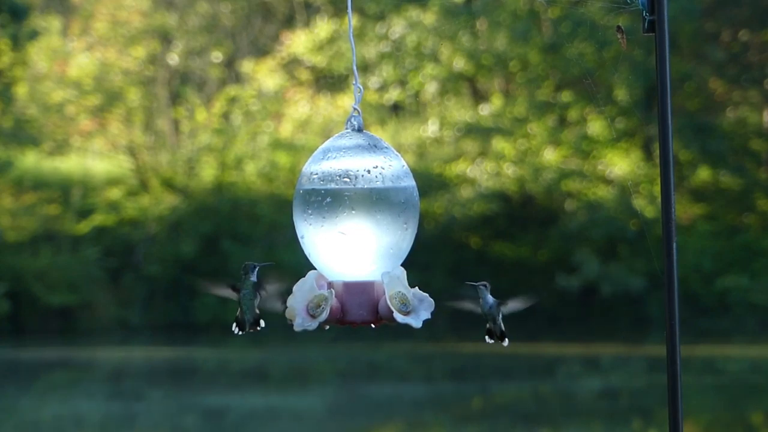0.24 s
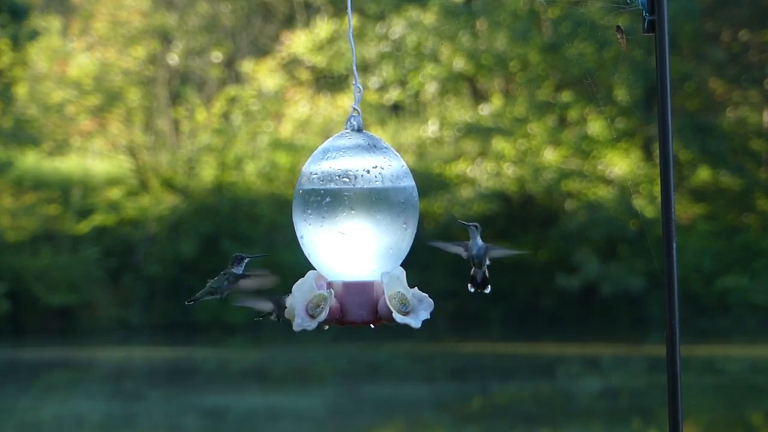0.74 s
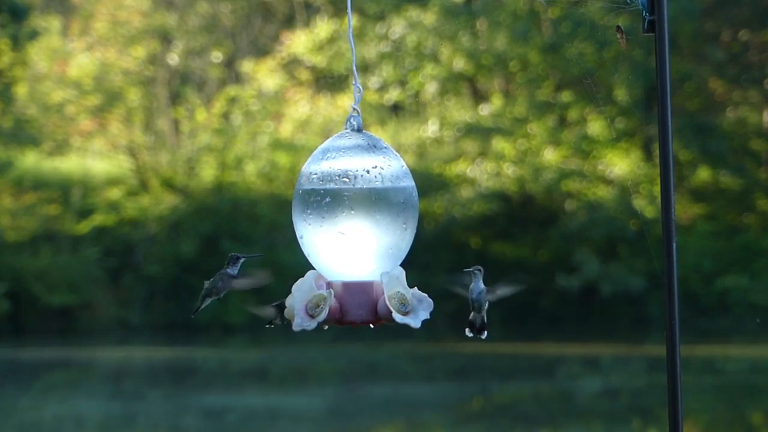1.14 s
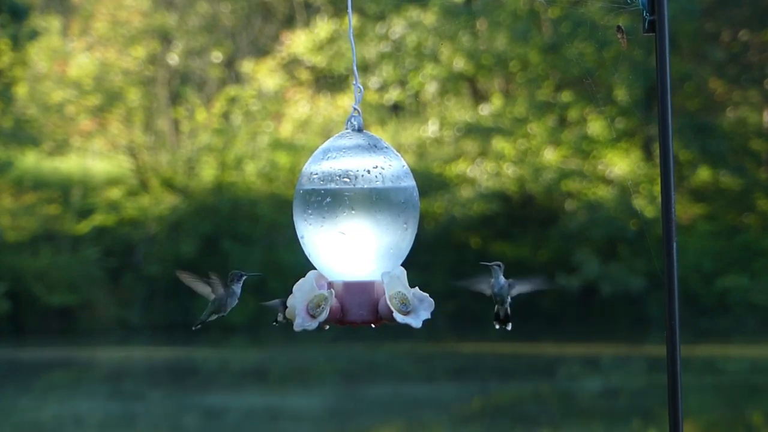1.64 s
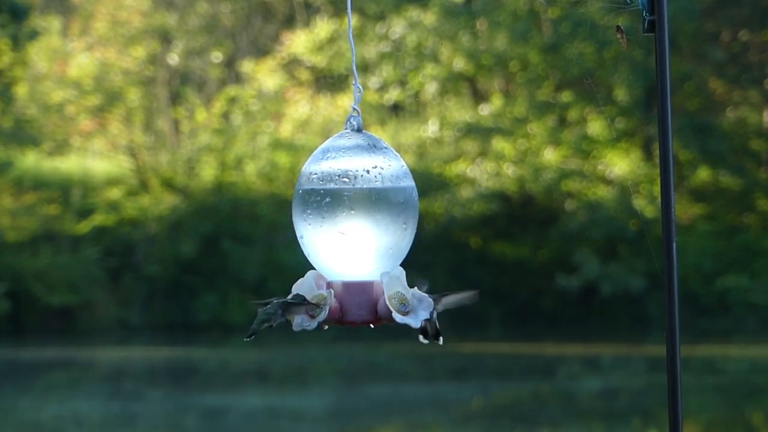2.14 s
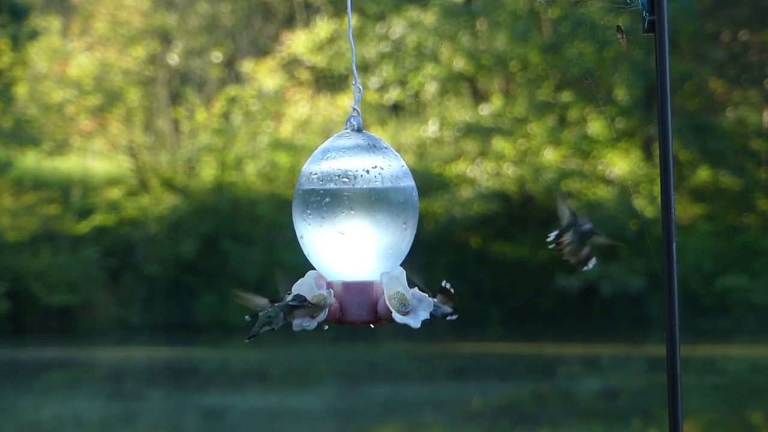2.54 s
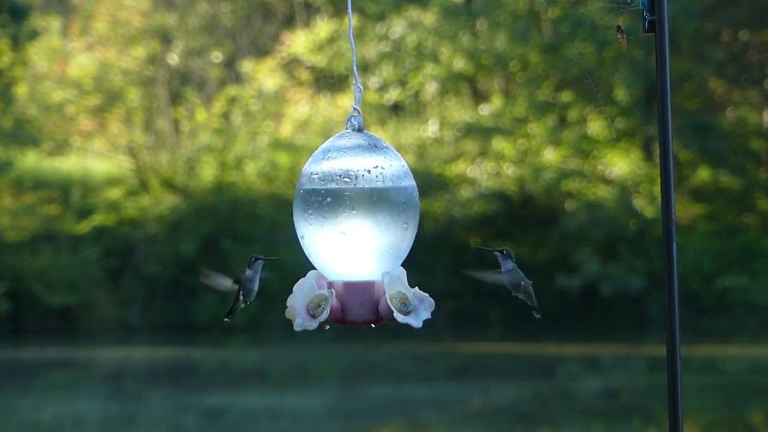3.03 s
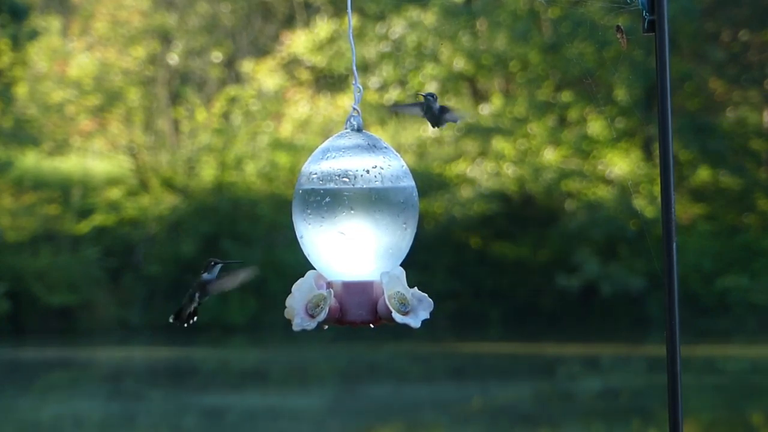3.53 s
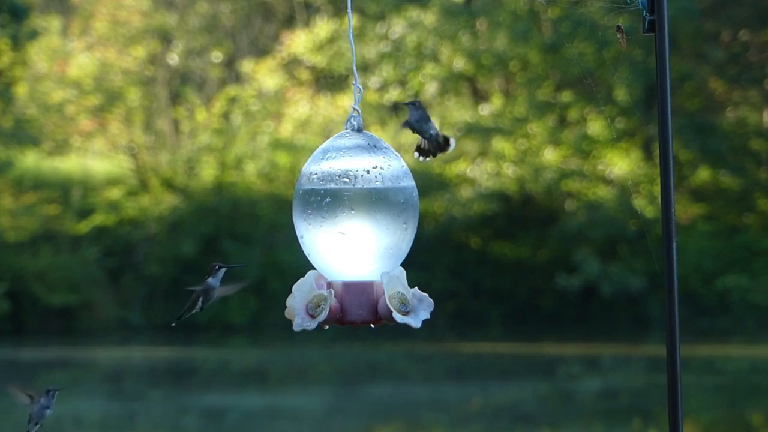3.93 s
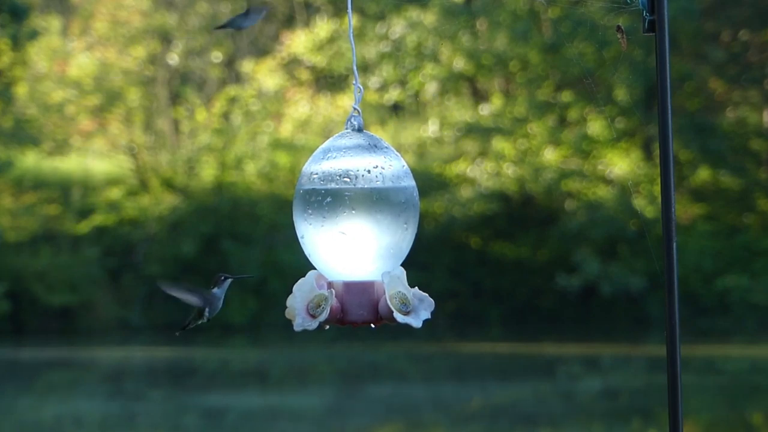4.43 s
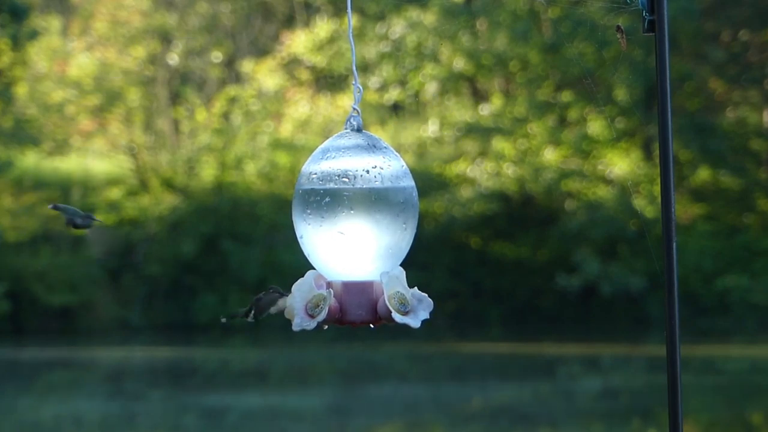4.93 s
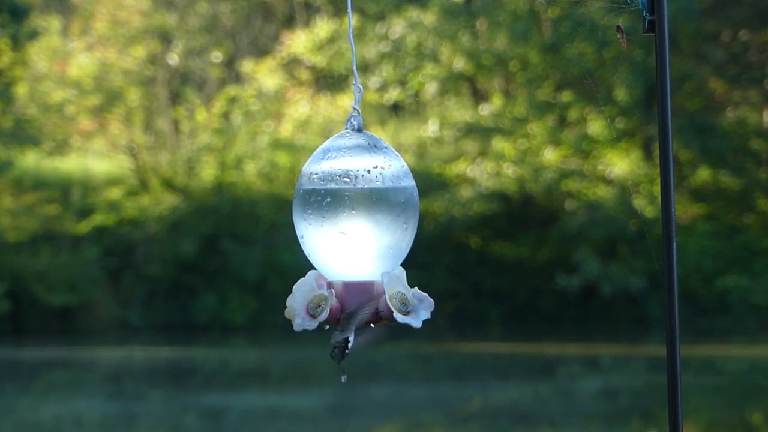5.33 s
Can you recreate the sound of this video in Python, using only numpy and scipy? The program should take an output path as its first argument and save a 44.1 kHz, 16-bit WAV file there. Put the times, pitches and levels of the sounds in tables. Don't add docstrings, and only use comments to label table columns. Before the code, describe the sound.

Sharp tiny bird chips, sparse at first, thicken into squeaks, a trill and scolding chatter above shimmering insects and a humming motor.

```python
import sys
import numpy as np
from scipy import signal
from scipy.io import wavfile
from scipy.ndimage import uniform_filter1d

SR = 44100
rng = np.random.default_rng(int(sys.argv[2]) if len(sys.argv) > 2 else 0)


def amplitude_ratio(level_db):
    exponent = np.asarray(level_db, float) / 20
    return 10 ** exponent


def wav_record(signal):
    frames = np.transpose(np.atleast_2d(signal))
    bounded = np.clip(frames, -1, 1)
    quanta = np.round(bounded * 32767).astype(np.int16)
    wavfile.write(sys.argv[1], SR, quanta)


N = 245637
T = np.arange(N) / SR

# t/s, length/s, first f/Hz, last f/Hz, peak level/dB [s, s, Hz, Hz, dB]
SLIDE_CALLS = [
    (0.232, .017, 5315, 1856, -25),
    (2.561, 0.032, 3790, 1944, -23.5),
    (2.846, 0.032, 3020, 1990, -28.5),
    (3.84, .028, 3620, 1886, -28),
    (4.539, 0.029, 3420, 1930, -25),
    (5.087, 0.039, 3840, 1920, -25),
]
DIVE_CALLS = [
    (1.019, 0.015, 7050, 2040, -21),
    (4.459, .043, 7900, 2100, -26.5),
]
HOOK_CALLS = [
    (2.753, 0.042, 7220, 2470, -25),
    (3.056, 0.051, 6450, 2343, -27.5),
    (4.01, .038, 5205, 2257, -25.5),
    (5.386, 0.043, 7540, 2225, -25.5),
]
RASP_CALLS = [
    (0.053, 0.024, 2500, 2400, -43),
    (0.559, 0.036, 2550, 2380, -43),
    (1.583, 0.016376, 3160, 2300, -38.5),
    (1.771, .02, 2580, 2250, -29.5),
    (1.798, 0.012, 2850, 2750, -32),
    (1.931, 0.014, 2300, 2350, -34),
    (1.973, .03, 2690, 2216, -25.5),
    (2.651, 0.01207, 2700, 2650, -27.5),
    (2.934, 0.03, 2320, 2059, -31.5),
    (5.043, 0.0094, 3040, 2220, -26),
]
BUZZ_CALLS = [
    (2.4, 0.078, 5340, 6660, -31.5),
    (3.7, 0.077, 8886, 8700, -38),
    (3.705, 0.11, 7500, 7311, -36.5),
    (3.98, 0.028, 6900, 7700, -28),
    (4.412, .066, 7078, 7200, -30.5),
    (4.424, 0.048, 8800, 8500, -33.5),
    (4.699, .023, 8000, 7900, -31),
    (5.369, 0.024, 8500, 8250, -33),
]
TICK_CALLS = [
    (2.396, .016, 9763, 8700, -33.5),
    (3.922, .012, 7370, 6500, -30.5),
    (4.411, .008, 7110, 7040, -23.5),
    (4.631, .012, 6870, 6826, -26.5),
    (4.934, .012, 7011, 5415, -26.5),
]
PEEP_CALLS = [
    (2.628, .03, 4640, 4600, -31),
    (2.702, 0.0149, 5190, 4710, -31),
]
WHISTLE_CALLS = [
    (4.668, 0.031, 6750, 6380, -34),
]
SWOOP_CALLS = [
    (4.859, .04, 6610, 2564, -26.5),
]
CLIMB_CALLS = [
    (4.995, .052, 2337, 8020, -29),
]
MEW_CALLS = [
    (5.1, 0.036, 2300, 1900, -34),
    (4.729, .053, 2540, 2180, -23.5),
    (5.468, 0.042, 2680, 1980, -25),
    (5.374, .025, 2550, 2100, -35),
    (5.4, 0.02, 3400, 3500, -37),
]
HISS_CALLS = [
    (2.693, .042, 2310, 2314, -35.5),
    (2.982, 0.055, 2190, 2520, -38),
    (3.392, .06, 2895, 2444, -36),
    (3.773, .035, 2440, 2380, -38.5),
]
CHATTER_CALLS = [
    (3.915, .04, 2444, 2310, -23.5),
    (4.623, .042, 2493, 2248, -24),
    (4.927, .04, 2496, 2320, -25),
    (5.262, 0.026, 2586, 2334, -21),
    (5.317, .028, 2750, 2340, -24),
]
PLUNGE_CALLS = [
    (5.198, .026, 6370, 2050, -26.5),
]
CALL_SHAPE = [(1.5, .2, 7.513, 20.84, 2), (3, 0.52, 16.4, 25, 1.9), (8, 0.23, 12, 17.3, 1),
              (0.7355, .18, 10, 16.585, 0.86), (1.4, 0.036, 4.5, 6.4, 1.55), (-1, 0.25, 16, 10.4, 0.94),
              (0.5, 0.23, 12, 14, 2.5), (5.5, 0.93, 4.14, 5, 1.1), (-4, .04, 3, 11, 3.1),
              (2.5, 0.15, 3.7, 6.2, 1.5), (0.0005, 0.15, 12, 19, 1.5), (1, 0.19, 8, 11.5, 1.2),
              (.3, 0.25, 10.594, 14.92, 1.23), (-2, .7, 7, 8, 1.543)]
CALL_TIMBRE = [(91, -12, -12, -1), (208, -9.5, -12, -0.5), (231.04, -6.5, -10, -1), (420, -24, -9, -0.5),
               (710, -31, -25, 1), (550, -27, -22, 1), (400, -1, -14.5, .4), (40, -3.5, -32, 3.42),
               (350, -18, -14, -.7), (910, -10, -15, 1), (153, -9.5, -13.5, -0.5), (500, -6, -1, -1.5),
               (262, -10.5, -6.5, -0.5), (321.2, -8, -5.5, 0)]
# t/s, top f/Hz, level/dB, dip depth/1
TRILL_CONTOUR = [
    (4.704, 6650, -33, 0),
    (4.722, 6870, -30.5, .33),
    (4.772, 6750, -35.5, 0.5),
    (4.82, 6653, -37, 0.5),
    (4.872, 6549, -67.5, 0.3),
]
# t/s, peak level/dB
BEAK_SNAPS = [
    (1.7734, -63),
    (4.9394, -43),
    (5.1218, -20),
    (5.144, -30),
]
# t/s, peak level/dB
WING_THUMPS = [
    (1.772, -37),
    (1.935, -39.5),
    (2.175, -42),
    (2.63, -41.5),
    (2.699, -44),
]
# t/s, half length/s, level/dB
FEATHER_RUSTLES = [(0.134, 0.031, -43), (0.55, .03, -61), (1.94, .012, -70), (2.65, 0.018, -41.5),
                   (2.721, 0.063, -51.5), (3.282, 0.0263, -43), (3.624, 0.048, -51), (4.79, 0.078, -41.5),
                   (4.904, 0.016, -36), (4.97, 0.035, -43), (5.142, 0.02688, -39), (5.21, .04, -47)]
# t/s, length/s, f/Hz, level/dB
CRICKET_CHIRPS = [(.33, 0.074, 8450, -73), (.62, 0.11, 8866, -58), (0.834, 0.088, 8265, -52),
                  (1.261, 0.075, 8343, -51), (1.52, 0.25, 8737, -57), (2.1, 0.071, 8250, -52),
                  (2.5, 0.14, 8240, -52), (4.115, 0.1121, 8350, -51), (5.003, 0.06337, 8140, -40),
                  (2.45, .1, 9850, -57.5), (3.808, 0.2023, 9615, -55), (5.385, .03, 9800, -52)]
# t/s, low level/dB, high level/dB
CHORUS_LEVELS = [
    (0.0, -44.5, -44),
    (1.55, -46.5, -44),
    (2.68, -41.5, -44.5),
    (4.4, -48.5, -44),
    (4.84, -53, -40),
    (5.27, -50, -44),
    (5.57, -65, -42.5),
]
# f/Hz, width/Hz, level/dB
LOW_CHORUS_MODES = [
    (2127, 155, -1),
    (2440, 250, -2.5),
    (2750, 160, -8),
    (3280, 156, -12),
    (3400, 1400, -7.5),
]
HIGH_CHORUS_MODES = [
    (5894, 390, -6.5),
    (6834, 645, 1),
    (6996, 2300, -15.5),
    (7806, 120, -9),
]
FAR_CHORUS_MODES = [
    (1171, 71.3, -1.5),
    (1373, 120, -2),
    (1545, 80, -2),
    (1731, 21, -7.5),
]
# f/Hz, level/dB rms
MAINS_LINES = [
    (120, -41.8),
    (240, -50.3),
    (300, -61),
]
# f/Hz, width/Hz, level/dB
HOUSING_MODES = [
    (405, 15, 4),
    (360, 42, -3),
    (478, 33.33, -12),
    (676.93, 32.98, -5.5),
    (853, 83, -12),
]
# t/s, level/dB
DRONE_LEVELS = [(0.0, -46), (0.65, -47), (0.99, -50), (1.18, -43.5), (1.35, -50), (1.38, -43), (1.5, -45),
                (1.61, -42), (1.95, -44.5), (1.99, -42), (2.22, -43), (3.43, -43), (3.57, -50),
                (3.74, -41.5), (3.77, -49), (3.83, -47), (5.52, -50.5), (5.57, -52)]
# f/Hz, density/dB per Hz
AIR_SPECTRUM = [(25, -12.5), (65, -29.5), (110, -6.5), (170, -6.5), (230, -9), (300, -10), (600, -21),
                (1450, -16.5), (1850, -23.5), (3500, -21), (4700, -12.5), (9500, -28), (15000, -34)]


def level(x, db):
    return x * amplitude_ratio(db) / np.sqrt(np.mean(x ** 2))


def band(x, hz, width_hz, order=1):
    edges_hz = [hz - width_hz / 2, hz + width_hz / 2]
    return signal.sosfilt(signal.butter(order, edges_hz, "band", fs=SR, output="sos"), x)


def walk(rate_hz):
    k = int(SR / rate_hz)
    held = np.repeat(rng.standard_normal(N // 50), k)[:N]
    return 1.38 * uniform_filter1d(uniform_filter1d(held, k), k)


def pair(share):
    mid, side = rng.standard_normal((2, N))
    return mid + share * side * np.array([[1], [-1]])


def pan(db):
    return amplitude_ratio(np.array([[db / 2], [-db / 2]]))


def birds():
    beak, wide_open = np.zeros((2, 2, N))
    kinds = (SLIDE_CALLS, DIVE_CALLS, HOOK_CALLS, RASP_CALLS, BUZZ_CALLS, TICK_CALLS, PEEP_CALLS, WHISTLE_CALLS,
             SWOOP_CALLS, CLIMB_CALLS, MEW_CALLS, HISS_CALLS, CHATTER_CALLS, PLUNGE_CALLS)
    for calls, shape, (blur_hz, octave_db, rasp_db, pan_db) in zip(kinds, CALL_SHAPE, CALL_TIMBRE):
        path = wide_open if calls is WHISTLE_CALLS else beak
        for start_s, *row in calls:
            hz, gain = call(*row, *shape)
            if calls is CHATTER_CALLS:
                pitch_stroke, gain_stroke = strokes(len(hz))
                hz, gain = hz * pitch_stroke, gain * gain_stroke
            i = int(start_s * SR)
            path[:, i:i + len(hz)] += pan(pan_db) * syrinx(hz, blur_hz, octave_db, rasp_db) * gain
    return band(beak, 5880, 7650, order=6) + wide_open


def call(length_s, first_hz, last_hz, peak_db, settle, crest, swell_db, fade_db, late):
    u = np.linspace(0, 1, int(length_s * SR))
    glide = np.expm1(-settle * u) / np.expm1(-settle)
    hz = first_hz * (last_hz / first_hz) ** glide
    swell = swell_db * np.clip(1 - u / crest, 0, 1)
    fade = fade_db * np.clip((u - crest) / (1 - crest), 0, 1) ** late
    edge = np.clip(np.minimum(u, 1 - u) * length_s / 0.00032, 0, 1)
    return hz, amplitude_ratio(peak_db - swell - fade) * edge


def strokes(count):
    phase = (T[:count] * 103.03 + .7) % 1
    pitch = 1 + 0.578 * np.exp(-phase / .08)
    gain = uniform_filter1d(1.29 * np.exp(-phase / 0.57), size=40)
    return pitch, gain


def syrinx(hz, blur_hz, octave_db, rasp_db):
    n = len(hz)
    white = rng.standard_normal((3, 8000)) + 1j * rng.standard_normal((3, 8000))
    wobble = signal.sosfilt(signal.butter(4, blur_hz * 1.07, fs=SR, output="sos"), white)[:, -n:]
    wobble = wobble / np.std(wobble, axis=1, keepdims=True)
    share = np.array([[blur_hz], [blur_hz + 200], [blur_hz + 400]]) / (blur_hz + 400)
    share = share ** .7
    shake = np.sqrt(1 - share) + np.sqrt(share) * wobble
    turns = np.exp(2j * np.pi * np.cumsum(hz) / SR) ** np.array([[1], [2], [3]])
    fade = np.clip((15000 - np.outer([1, 2, 3], hz)) / min(blur_hz ** 2 / 8, 8000), 0, 1)
    tone = np.real(amplitude_ratio([0, octave_db, octave_db - 10]) @ (shake * turns * fade))
    phase = np.cumsum(np.repeat(rng.uniform(.85, 1.15, 40), 300)[:n]) * 100 / SR
    slap = np.exp(-((phase + .7) % 1) / .4)
    slap = uniform_filter1d(slap, size=90)
    slap /= np.sqrt(np.mean(slap ** 2))
    tone *= 1 + np.clip(blur_hz / 600 - .2, 0, .6) * (slap - 1)
    puffs = slap * band(white[0].imag, 3320, 3922, order=2)[-n:]
    return np.sqrt(2) * tone + amplitude_ratio(rasp_db) * puffs / np.std(puffs)


def trill():
    out = np.zeros((2, N))
    s, *columns = np.transpose(TRILL_CONTOUR)
    on = slice(int(s[0] * SR), int(s[-1] * SR))
    hz, db, depth = (np.interp(T[on], s, c) for c in columns)
    beat = np.pi * 74 * (T[on] - 4.7272)
    dip = (1 - np.abs(np.sin(beat))) ** 1.3 * (beat > -np.pi / 2)
    tone = syrinx(hz * (1 - depth * dip), blur_hz=70, octave_db=6.5, rasp_db=-12)
    out[:, on] = pan(1) * tone * amplitude_ratio(db - 11 * dip)
    return porch(band(out, 7000, 8066, order=4), 0.11, -2.5)


def snaps(events, hz, width_hz, decay_s, lift_db):
    out = np.zeros(N)
    for s, db in events:
        burst = rng.standard_normal(900) * np.exp(-T[:900] / decay_s)
        out[int(s * SR):int(s * SR) + 900] += amplitude_ratio(db + lift_db) * burst
    return band(out, hz, width_hz, order=2) * pan(-1)


def rustle():
    swell = sum(amplitude_ratio(db) * np.exp(-((T - s) / half_s) ** 2 / 2) for s, half_s, db in FEATHER_RUSTLES)
    grains = pair(.45) * amplitude_ratio(.8 * walk(300))
    return level(band(grains, 6940, 6700, order=2), 0) * swell


def echoes(x):
    wall_s, wall_db = .0046, -11
    t = T[:SR // 2]
    tail = rng.standard_normal((2, len(t))) * amplitude_ratio(-60 * t / 0.22) * (t > .008)
    tail *= amplitude_ratio(-10.5) / np.sqrt(np.sum(tail ** 2) / 2)
    tail[:, 0] = 1
    tail[0, int(wall_s * SR)] = amplitude_ratio(wall_db)
    tail[1, int(wall_s * SR) + 3] = amplitude_ratio(wall_db + 8.0)
    return signal.fftconvolve(x, tail, axes=1)[:, :N]


def porch(x, t60_s, wet_db):
    tail = rng.standard_normal(4000) * amplitude_ratio(-60 * T[:4000] / t60_s)
    tail *= amplitude_ratio(wet_db) / np.sqrt(np.sum(tail ** 2))
    tail[0] = 1
    tail /= np.sqrt(np.sum(tail ** 2))
    return signal.fftconvolve(x, tail[None], axes=1)[:, :N]


def crickets():
    out = np.zeros(N)
    for s, length_s, hz, db in CRICKET_CHIRPS:
        shape = np.sin(np.pi * np.clip((T - s) / length_s, 0, 1)) ** 0.35
        out += shape * level(band(rng.standard_normal(N), hz, 97.6, order=2), db - 1.0)
    return out * pan(0)


def chorus(modes, rate_hz, share, flicker_db):
    out = 0
    for hz, width_hz, db in modes:
        clicks = pair(share) * (rng.random(N) < rate_hz / SR)
        out = out + level(band(clicks, hz, width_hz, order=2), db) * amplitude_ratio(flicker_db * walk(9))
    return level(out, 0)


def cooler(drone_db):
    hum = duct = 0
    for k, (hz, db) in enumerate(MAINS_LINES):
        hum = hum + np.sqrt(2) * amplitude_ratio(db + 0.067 * k * walk(20)) * np.sin(2 * np.pi * hz * T + k)
    for hz, width_hz, db in HOUSING_MODES:
        ring = band(pair((hz / 700) ** 1.53), hz, width_hz)
        duct = duct + level(ring, db) * amplitude_ratio(2.1 * walk(11))
    late = np.array([hum, np.roll(hum, 26)])
    return late + level(duct, 0) * amplitude_ratio(drone_db + 3.0)


def air():
    out = 0
    knots_hz, dbs = np.transpose(AIR_SPECTRUM)
    for hz in 30 * 2 ** np.arange(0, 9.1, .5):
        db = np.interp(np.log(hz), np.log(knots_hz), dbs) + 10 * np.log10(hz) + 0.4 * walk(3)
        share = np.interp(np.log(hz), np.log([40, 200, 600, 1600, 3000]), [1.3, .45, 1.2, 1.2, .6])
        out = out + amplitude_ratio(db) * level(band(pair(share), hz, hz / 2.43, order=2), 0)
    return level(out, -44.5)


def scene():
    s, *columns = np.transpose(CHORUS_LEVELS)
    low_db, high_db = (np.interp(T, s, c) for c in columns)
    insects = chorus(LOW_CHORUS_MODES, 1500, 0.8235, 3.3) * amplitude_ratio(low_db)
    insects = insects + chorus(HIGH_CHORUS_MODES, 4000, 0.15, 0.5315) * amplitude_ratio(high_db)
    insects = insects + chorus(FAR_CHORUS_MODES, 900, 0.7, 4.03) * amplitude_ratio(-55.5)
    far = porch(insects + air(), t60_s=0.052, wet_db=-4.5)
    far = far - 0.5926 * band(far, 4600, 740)
    knocks = snaps(BEAK_SNAPS, 8346, 13000, 0.002302, 0.5) + snaps(WING_THUMPS, 2140, 3300, 0.036, 10.05)
    calls = porch(amplitude_ratio(2.0) * (birds() + trill()), t60_s=.025, wet_db=-10)
    near = echoes(calls) + knocks + rustle()
    drone_db = np.interp(T, *np.transpose(DRONE_LEVELS))
    return near + far + crickets() + cooler(drone_db)


def band_limit(x):
    return signal.sosfilt(signal.butter(12, 15770, fs=SR, output="sos"), x)


def record(dry):
    mix = signal.sosfilt(signal.ellip(8, .2, 70, 15550, fs=SR, output="sos"), dry)
    return band_limit(mix)


dry = scene()
out = record(dry)
wav_record(out)
```